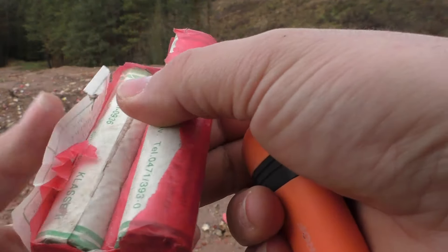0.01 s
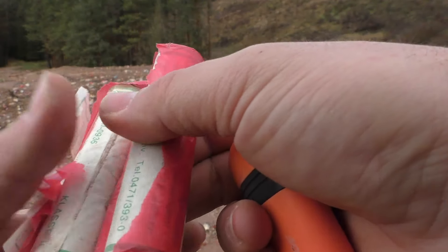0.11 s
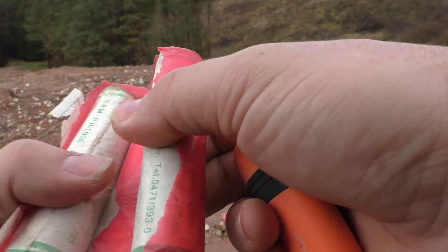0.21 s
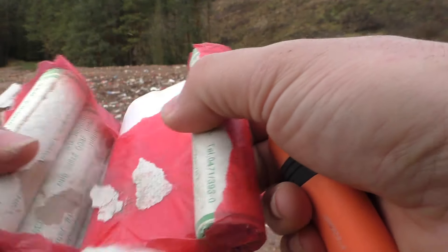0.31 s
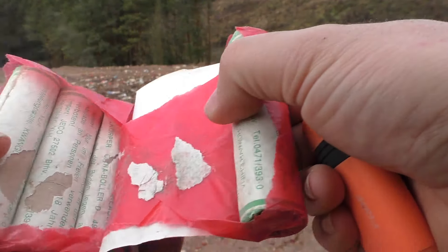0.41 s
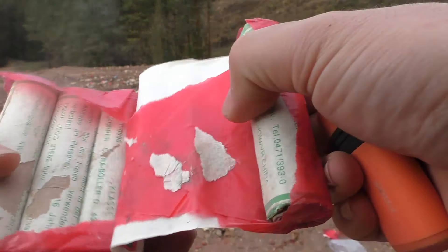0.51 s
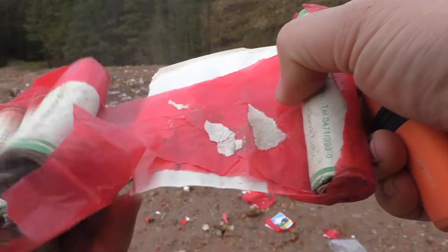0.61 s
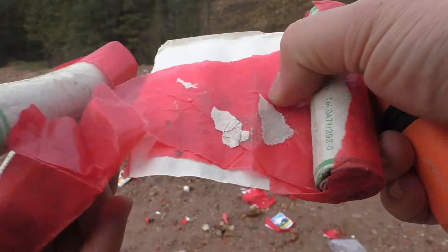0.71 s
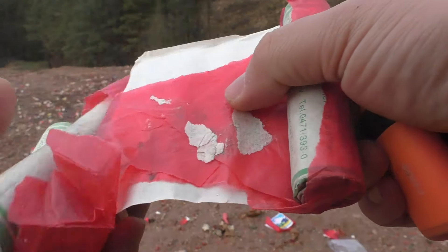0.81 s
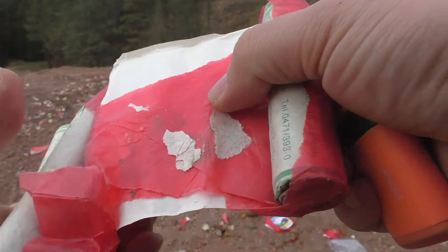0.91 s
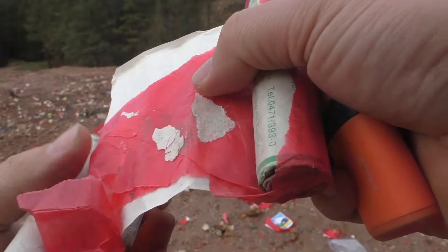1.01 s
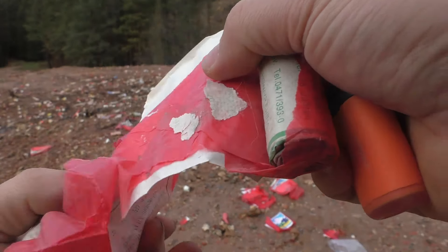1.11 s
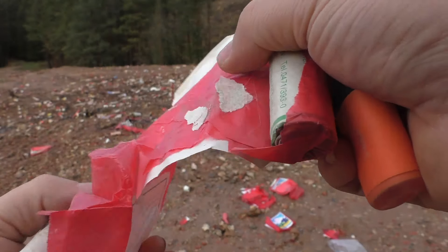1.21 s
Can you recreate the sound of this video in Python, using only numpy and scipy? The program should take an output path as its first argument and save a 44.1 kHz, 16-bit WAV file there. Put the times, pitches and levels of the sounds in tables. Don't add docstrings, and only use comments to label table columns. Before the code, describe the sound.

Thin wrapping paper is torn open by hand in a loud crackling rip, then lightly crumpled

```python
import sys
import numpy as np
from scipy import signal
from scipy.fft import rfft, irfft
from scipy.io import wavfile
from scipy.ndimage import uniform_filter1d

SR = 44100
rng = np.random.default_rng(int(sys.argv[2]) if len(sys.argv) > 2 else 0)


def invert_db(level):
    return 10 ** (np.asarray(level, dtype=float) / 20)


def generate_wav(signal):
    frames = np.transpose(np.atleast_2d(signal))
    scaled = np.clip(frames, -1, 1) * 32767
    pcm = np.round(scaled).astype(np.int16)
    wavfile.write(sys.argv[1], SR, pcm)


N = 57330
SIZE = 2048

# time in seconds, effort in dB, tautness of the sheet in dB.
GRIP_MOVE = [(0, -43, 0), (0.046, -55, -4.5), (0.056, -45, -4.5), (0.069, -81, 19), (.088, -59, -9),
             (0.095, -53, 0), (0.137, -39.5, -3.5), (0.147, -33.5, -5), (0.167, -42.5, 1.5)]
RIP_MOVE = [(0.194, -30, 3.5), (0.241, -21, -1), (.266, -21, 0.5), (0.285, -19, -0.5), (0.29, -15.5, -4),
            (0.371, -16, -1.5), (0.413, -30.5, 1.5), (0.454, -32.5, -2.5), (0.462, -41.5, 6)]
PEEL_MOVE = [(0.486, -38, -8), (0.496, -46, -6.5), (0.508, -37.5, -4), (0.513, -28, 2.8), (0.562, -18, 2),
             (.62, -21, 0.3), (0.664, -24.5, -1.4), (0.693, -31.5, -3.5), (0.788, -30, -2)]
CRUMPLE_MOVE = [(0.886, -36, -1), (0.901, -40, -1.5), (1.033, -42.5, -3.5), (1.1, -29, -2),
                (1.154, -38, -2.5), (1.173, -28, 0), (1.201, -44.5, -2), (1.255, -45, -7.5),
                (1.285, -40, -1)]
MOVES = GRIP_MOVE + RIP_MOVE + PEEL_MOVE + CRUMPLE_MOVE

# start in seconds, flick peak in dB,
# tick peak in dB, flick pitch in Hz.
CREASE_SNAPS = [(0.0014, -41, -34, 1100), (0.0067, -33, -33, 1150), (0.0155, -37, -24, 2080),
                (0.0248, -29, -24, 1450), (0.0336, -43, -30, 1000), (0.0513, -41, -38, 1220),
                (0.057, -40, -40, 1250), (0.0917, -38, -32, 1690), (0.0952, -51, -37, 1030),
                (0.0991, -44, -27, 1820), (0.1057, -37, -23, 1790), (0.1167, -39, -31, 1980),
                (0.1209, -42, -26, 1070), (0.1441, -26, -36, 1500), (0.148, -20, -19, 1670),
                (0.1516, -18, -25, 1490), (0.1585, -29, -27, 1470), (0.1745, -36, -26, 1890),
                (0.1897, -23, -22, 1590), (0.1954, -22, -22, 1660), (0.2103, -20, -20, 1050),
                (0.216, -18, -19, 1350), (0.2212, -22, -10, 1570), (0.2324, -15, -11, 1910),
                (0.2391, -11, -10, 1440), (0.2553, -11, -11, 1320), (0.2645, -5, -10, 1270),
                (0.2873, -2, -7, 1100), (0.3069, -7, -15, 1230), (0.3136, -7, -13, 1460),
                (0.3525, -12, -6, 1290), (0.3694, -7, -8, 900), (0.3844, -11, -12, 1490),
                (0.412, -25, -19, 1580), (0.4214, -28, -20, 980), (0.4327, -18, -23, 1110),
                (0.4391, -21, -27, 1570), (0.4482, -19, -14, 830), (0.4531, -26, -14, 950),
                (0.4566, -24, -26, 870), (0.4692, -34, -23, 1200), (0.4747, -20, -18, 780),
                (0.4876, -26, -19, 750), (0.5107, -17, -15, 830), (0.5178, -19, -21, 830),
                (0.5234, -17, -17, 830), (0.5458, -13, -12, 930), (0.566, -14, -7, 1110),
                (0.5962, -20, -10, 1170), (0.6003, -16, -9, 1210),
                (0.6115, -13, -17, 1280), (0.6417, -19, -12, 1010), (0.6452, -19, -12, 1160),
                 (0.649, -20, -12, 1570), (0.7209, -20, -19, 1560), (0.7349, -18, -16, 980),
                 (0.7398, -20, -12, 1090), (0.7496, -20, -28, 1070), (0.7551, -26, -19, 890),
                 (0.7642, -17, -22, 1230), (0.7693, -27, -14, 1350), (0.7769, -21, -14, 1190),
                 (0.7826, -20, -14, 1030), (0.8037, -27, -20, 1060), (0.8397, -35, -20, 1430),
                 (0.85, -31, -25, 1280), (0.8529, -30, -21, 1660), (0.866, -33, -24, 1080),
                 (0.8715, -29, -18, 1920), (0.8855, -25, -26, 1190), (0.8901, -25, -37, 1070),
                 (0.9056, -32, -30, 1300), (0.9232, -28, -30, 1160), (0.9298, -39, -27, 1330),
                 (0.9463, -33, -27, 1080), (0.9573, -27, -23, 1010), (0.9641, -26, -30, 1400),
                 (0.9708, -38, -24, 1500), (0.9871, -42, -26, 1610), (0.9976, -30, -32, 1460),
                 (1.0196, -33, -21, 1170), (1.0324, -32, -19, 1320), (1.0541, -24, -25, 1930),
                 (1.0597, -25, -29, 1210), (1.0663, -32, -20, 1880), (1.0863, -29, -13, 1560),
                 (1.1593, -28, -23, 1370), (1.1655, -26, -22, 1640), (1.1702, -25, -19, 1890),
                 (1.1769, -20, -28, 1420), (1.1825, -30, -21, 1240), (1.1969, -35, -29, 930),
                 (1.22, -30, -20, 1390), (1.2266, -34, -33, 1320), (1.2354, -34, -30, 1460),
                 (1.2461, -36, -31, 820), (1.2605, -39, -34, 1540), (1.267, -34, -29, 1240),
                 (1.2845, -34, -27, 1110), (1.2885, -35, -26, 1860),
                (.2422, -14, -12, 1500), (.2613, -6, -12, 1350), (.3007, -9, -12, 1300),
              (.3103, -8, -13, 1400), (.328, -11, -14, 1500), (.3385, -10, -12, 1000),
              (.5295, -14, -15, 700), (.5365, -13, -14, 850), (.5735, -14, -12, 1500),
              (.5912, -15, -15, 1100), (.6021, -13, -12, 1300), (.6717, -21, -19, 2600),
              (1.0876, -21, -18, 1500), (1.1001, -22, -26, 1200), (1.111, -24, -24, 1400)]
ALL_SNAPS = CREASE_SNAPS

# start in seconds, peak in dB, pitch in Hz, time to fall by 60 dB in seconds.
ROLL_KNOCKS = [(0.2881, 0.5, 239, 0.016), (0.2885, -21, 124, 0.038), (0.327, -14, 195, 0.079),
               (.385, -22, 89, 0.051), (0.458, -20.5, 408, 0.016), (0.455, -30, 116, 0.11),
               (.526, -12.5, 320, 0.019), (0.53, -19, 95, 0.062), (0.545, -14, 294, 0.042),
               (.562, -19.5, 416, 0.1), (0.565, -26, 89, 0.059), (0.588, -18.5, 146.6, 0.077),
               (0.596, -15, 57, 0.057), (0.755, -31.5, 157, 0.16), (0.854, -26, 60, 0.05),
               (0.878, -25.5, 70, 0.036), (1.061, -36, 337, 0.047)]

# frequency in Hz, level in dB.
SHEET_COLOUR = [(80, -30.5), (250, -15), (500, -4), (830, -3.5), (1100, 0), (2200, -4.5), (3300, -16.5),
                (4600, -22.5)]
FIBRE_COLOUR = [(2350, -43), (4460, -19.5), (5610, -6), (7610, 2.5), (8840, 2), (10600, -10), (12500, -1.5),
                (15800, -4)]
FLAP_COLOUR = [(30, -2.5), (60, -3.5), (150, 0), (350, 1.5), (700, -17.5)]
CRACK_COLOUR = [(1500, -18), (3000, -7), (4500, 5), (7000, -29)]
AIR_COLOUR = [(18, -36), (30, 5.5), (128, 6), (510, -12.5), (1000, -6), (4870, -37), (9340, -45),
              (12000, -64), (15600, -93), (22000, -120)]

OWN_SHARE = 0.58


def evened(x):
    return x / np.sqrt(np.mean(x ** 2) + 1e-20)


def read(points, hz):
    f, value = np.transpose(points)
    return np.interp(np.log(hz + 1), np.log(f + 1), value)


def colour(x, points):
    hz = abs(np.fft.fftfreq(SIZE, 1 / SR))
    log_gain = np.log(invert_db(np.maximum(read(points, hz), -70)))
    spectrum = np.exp(signal.hilbert(log_gain).conj())
    taps = np.fft.ifft(spectrum).real[:SIZE // 2]
    taps = taps / np.linalg.norm(taps)
    return signal.oaconvolve(x, taps[None], axes=1)[:, :N]


def add(mix, start_s, sound):
    part = mix[:, round(start_s * SR):][:, :sound.shape[1]]
    part += sound[:, :part.shape[1]]


def burst(ms, place, own=0.0):
    lag_us, lag_spread_us = 23.2, 6.8
    t = np.arange(SIZE // 4) / SR
    fade = np.exp(-1000 * t / np.clip(ms, 0.1, 8)) * np.minimum(t * 6000, 1)
    shared, extra = rng.standard_normal((2, len(t))) * fade
    tilt = rng.uniform(-0.25, 0.4)
    shared = shared + tilt * np.roll(shared, 1)
    extra = extra + tilt * np.roll(extra, 1)
    own = np.clip(own, 0, 1)
    right = np.sqrt(1 - own ** 2) * shared + own * extra
    delay = (lag_us + lag_spread_us * place) / 1.086e6
    lag = np.exp(-2j * np.pi * np.fft.rfftfreq(len(t), 1 / SR) * delay)
    return np.array([shared, irfft(rfft(right) * lag)]) / np.linalg.norm(shared)


def hail(per_s, spread_db, ms, level_db, own, count=24):
    draw = rng.random((N, 3))
    thin = invert_db(0.38 * np.minimum(level_db + 24, 0))
    size = evened(invert_db(spread_db * np.minimum(-np.log(draw[:, 0] + 1e-9), 4)))
    happens = draw[:, 1] < thin * per_s / SR
    size = size * happens * np.sqrt(SR / per_s / thin) * invert_db(level_db)
    kind = (draw[:, 2] * count).astype(int)
    out = np.zeros((2, N))
    for k in range(count):
        grain = burst(ms * 2 ** rng.uniform(-1.5, 1), rng.standard_normal(), own)
        out += signal.oaconvolve((size * (kind == k))[None], grain, axes=1)[:, :N]
    return out


def pull():
    clump_db, clump_ms = -1, 9.3
    shower_db, shower_ms = 6.0, 5.0
    s, effort_db, taut_db = np.transpose(MOVES)
    t = np.arange(N) / SR
    width = max(round(clump_ms * SR / 1000), 1)
    clumps = uniform_filter1d(uniform_filter1d(rng.standard_normal(N), width), width)
    level_db = np.interp(t, s, effort_db) + clump_db * evened(clumps)
    starts = np.bincount([round(row[0] * SR) for row in ALL_SNAPS], minlength=N)
    fade = np.exp(-1000 * t[:SIZE] / np.clip(shower_ms, 1, 12))
    shower = np.minimum(signal.oaconvolve(starts, fade)[:N], 1)
    weakness = np.clip(-(level_db + 23) / 15, 0, 1)
    return level_db + shower_db * (shower - 0.3) * weakness, np.interp(t, s, taut_db)


def sheet_pops(level_db, taut_db):
    pops = hail(3200, 3.0, 1.73, level_db - 4.5 - taut_db / 2, 0.0)
    stiffness = 3.0 * invert_db(np.minimum(level_db + 8, 0))
    return pops + stiffness * np.diff(pops, axis=1, prepend=0)


def fibre_ticks(level_db, taut_db):
    return hail(4400, 3.0, 0.98, level_db - 0.5 + taut_db / 2, OWN_SHARE)


def sheet_flaps(level_db, taut_db):
    a, b = rng.standard_normal((N, 2)).T
    flap_db = -32 + 0.96 * (level_db + 18) - 1.7 * taut_db
    return np.array([a + 0.39 * b, a - 0.11 * b]) * invert_db(flap_db)


def crease_snaps(pops, ticks):
    pop_ms, tick_ms = 1.94, 1
    flicks, cracks = np.zeros((2, 2, N))
    t = np.arange(SIZE // 4) / SR
    for s, flick_db, tick_db, hz in ALL_SNAPS:
        place = rng.standard_normal()
        turns = t * hz
        swing = 2 * np.sin(2 * np.pi * turns) * turns * np.exp(-turns / 0.47)
        add(flicks, s, invert_db(flick_db + 6) * np.array([swing, swing]))
        add(pops, s, invert_db(flick_db - 9) * 5 * burst(pop_ms, place))
        add(cracks, s, invert_db((flick_db + tick_db) / 2 - 11) * burst(tick_ms, place))
        add(ticks, s, invert_db(tick_db + 1.5) * 3.28 * burst(tick_ms, place, OWN_SHARE))
    return flicks, cracks


def paper():
    level_db, taut_db = pull()
    pops = sheet_pops(level_db, taut_db)
    ticks = fibre_ticks(level_db, taut_db)
    flaps = sheet_flaps(level_db, taut_db)
    flicks, cracks = crease_snaps(pops, ticks)
    pops += invert_db(-46) * np.roll(pops, 90, axis=1) * [[1], [-1]]
    grains = colour(pops, SHEET_COLOUR) + colour(ticks, FIBRE_COLOUR)
    return grains + colour(flaps, FLAP_COLOUR) + colour(cracks, CRACK_COLOUR) + flicks


def rolls():
    out = np.zeros((2, N))
    t = np.arange(SIZE * 4) / SR
    for s, db, hz, t60 in ROLL_KNOCKS:
        fade = invert_db(db - 60 * t / t60)
        swing = fade * np.sin(2 * np.pi * hz * t) * np.minimum(t * hz * 3.1, 1)
        add(out, s, -swing * invert_db([[0.8], [-0.8]]))
    return out


def air():
    a, b, lumps = rng.standard_normal((N, 3)).T
    gusts = invert_db(2.2 * evened(uniform_filter1d(lumps, 3000)))
    apart = invert_db(-3) * b
    return invert_db(-50.5) * colour(gusts * np.array([a + apart, a - apart]), AIR_COLOUR)


def scene():
    return paper() + rolls() + air()


def low_pass(x):
    return signal.sosfilt(signal.butter(12, 16520, fs=SR, output="sos"), x)


def record(dry):
    x = signal.lfilter(*signal.butter(2, 41.6, "high", fs=SR), dry)
    x = x * invert_db(np.array([[0.435], [-0.435]]))
    notched = signal.lfilter(*signal.iirnotch(10540, 17, fs=SR), x)
    x = (x + 2 * notched) / 3
    treble_limit = signal.firwin(401, 15850, window=("kaiser", 9), fs=SR)
    x = signal.oaconvolve(x, treble_limit[None], "same", axes=1)
    return low_pass(np.clip(x, -1, 1))


dry = scene()
out = record(dry)
generate_wav(out)
```